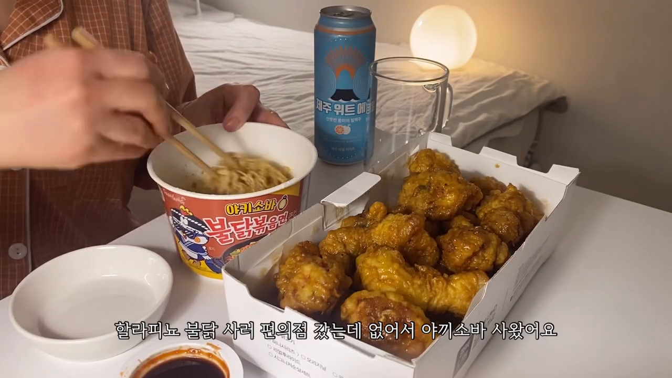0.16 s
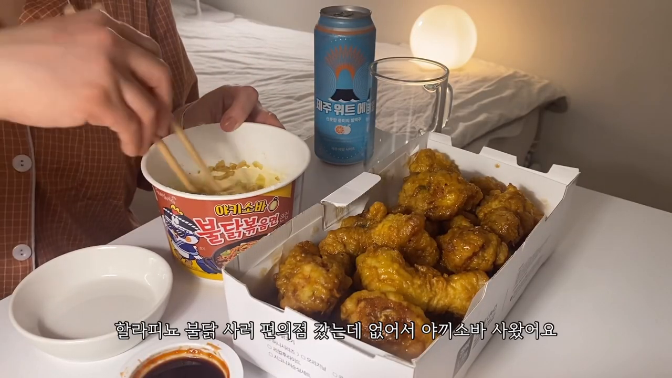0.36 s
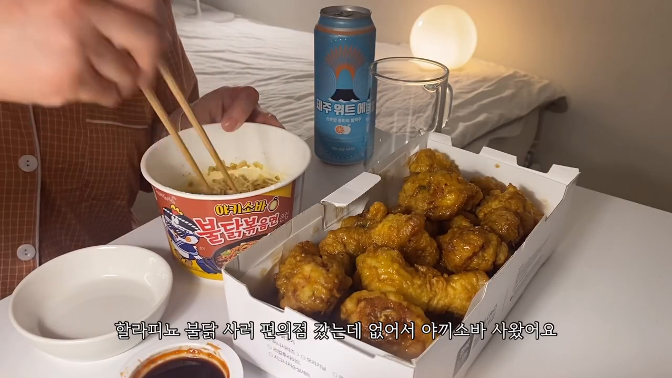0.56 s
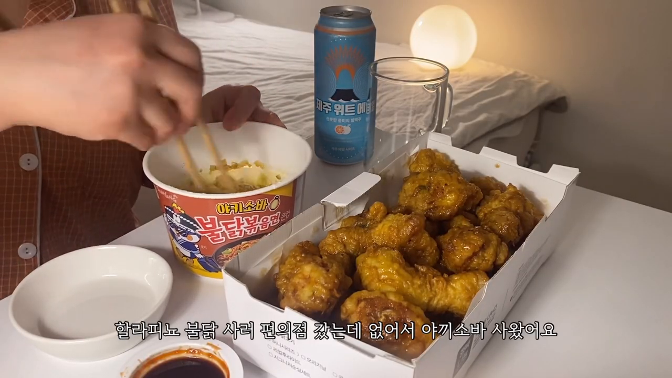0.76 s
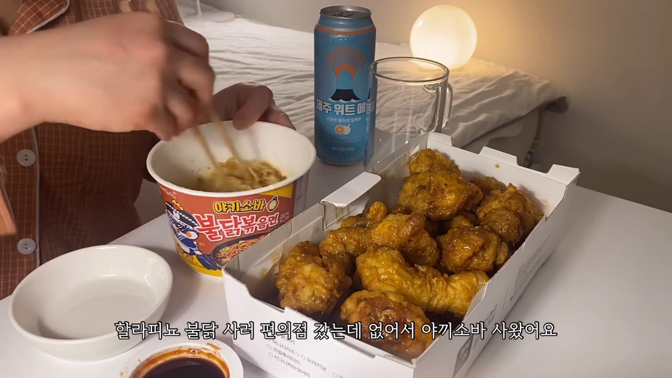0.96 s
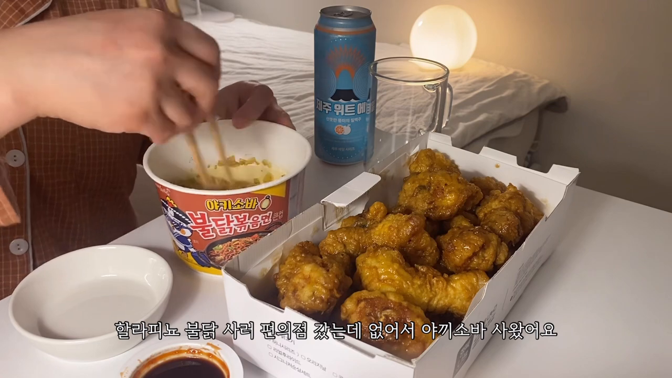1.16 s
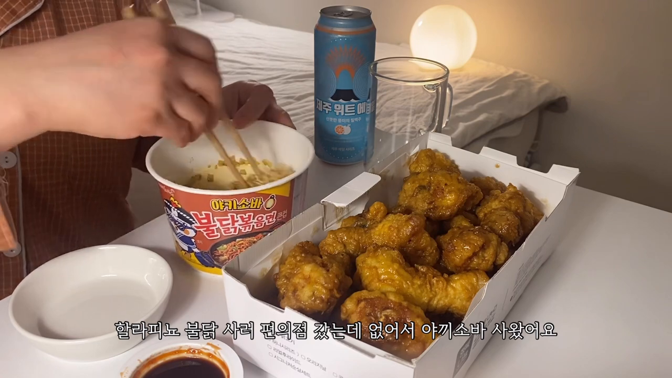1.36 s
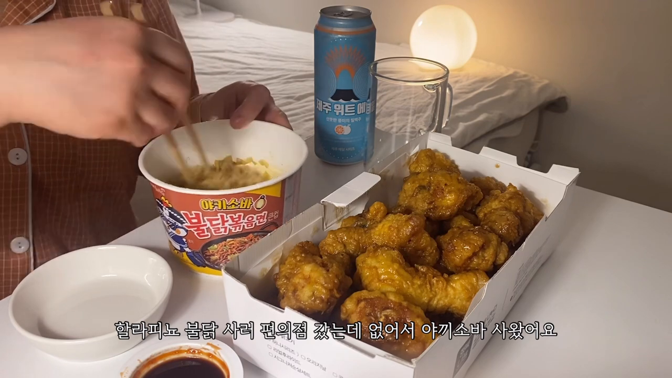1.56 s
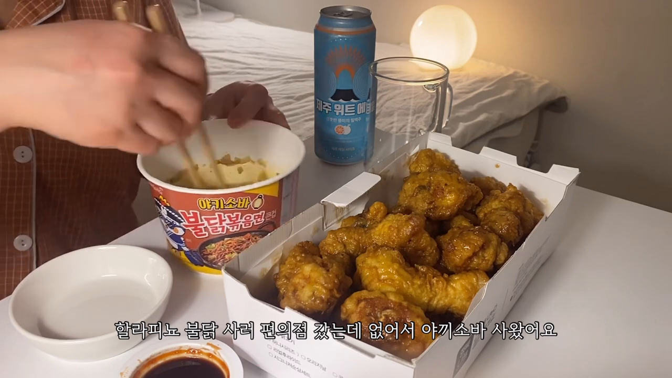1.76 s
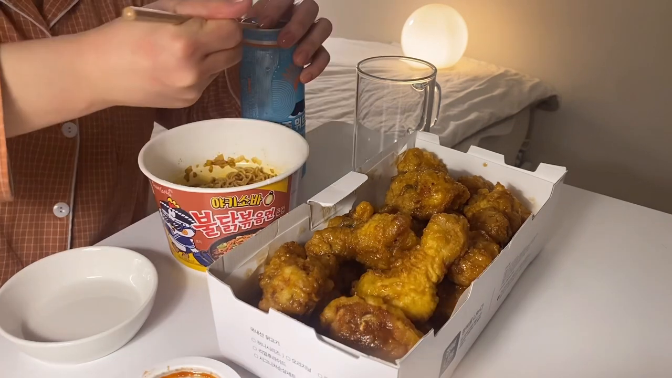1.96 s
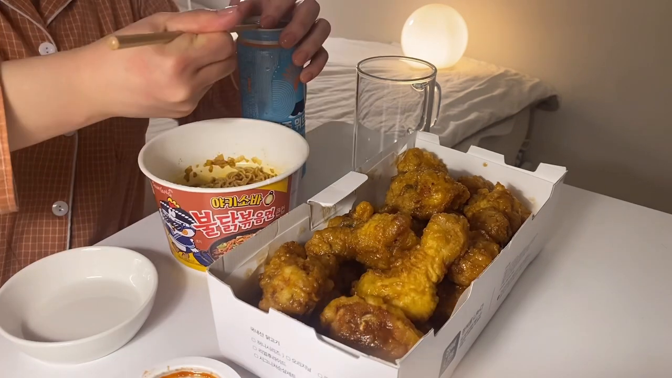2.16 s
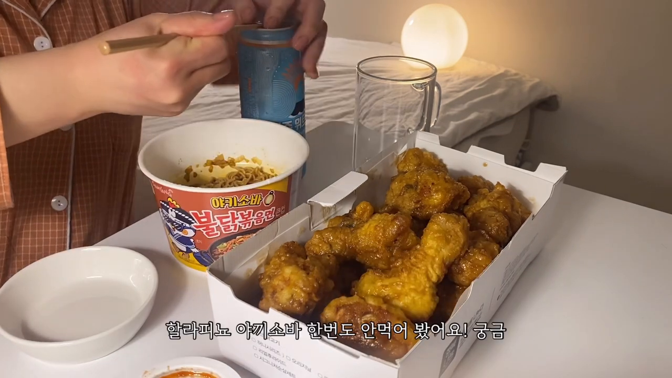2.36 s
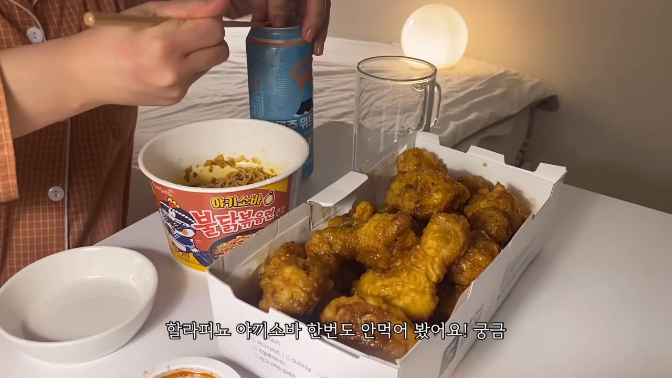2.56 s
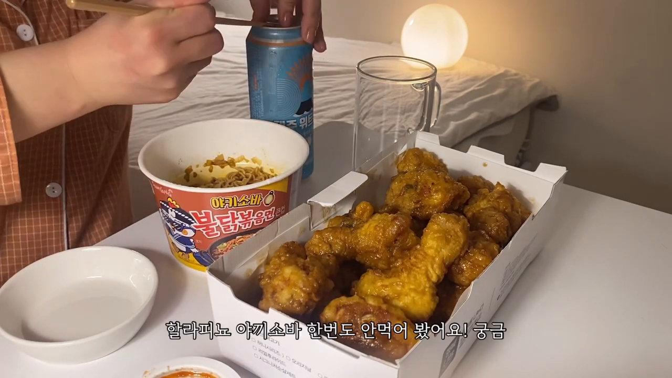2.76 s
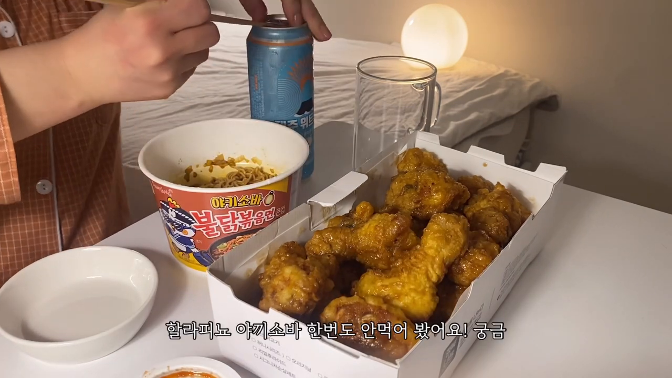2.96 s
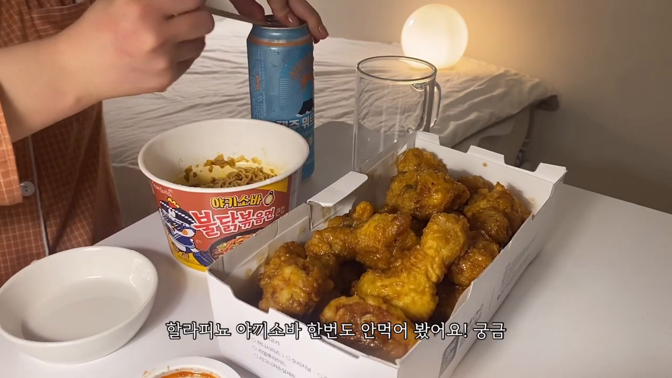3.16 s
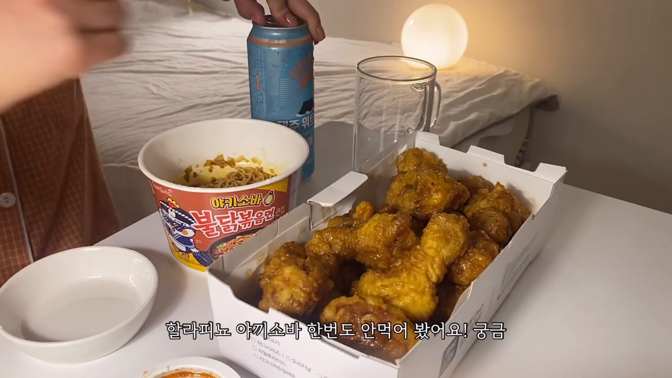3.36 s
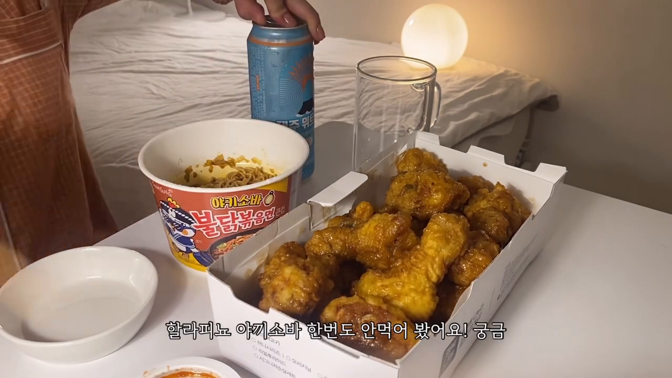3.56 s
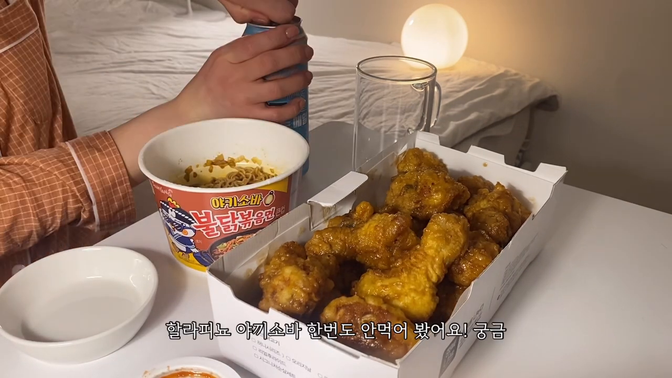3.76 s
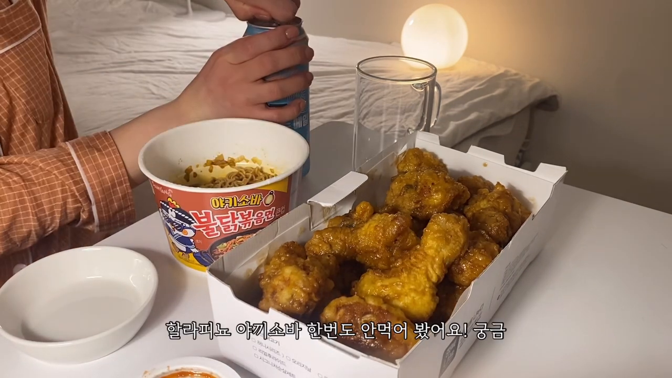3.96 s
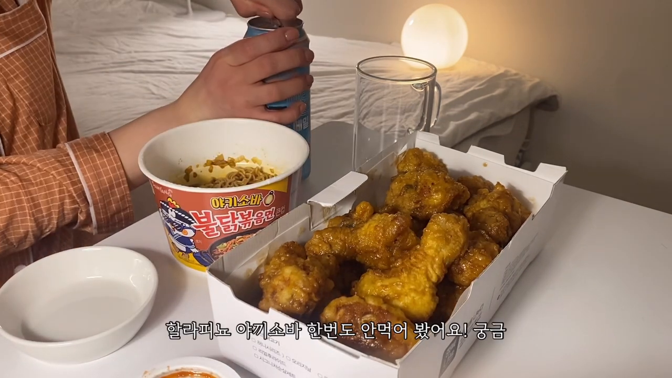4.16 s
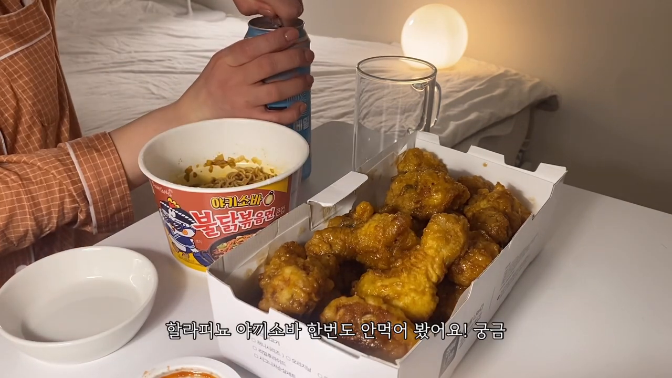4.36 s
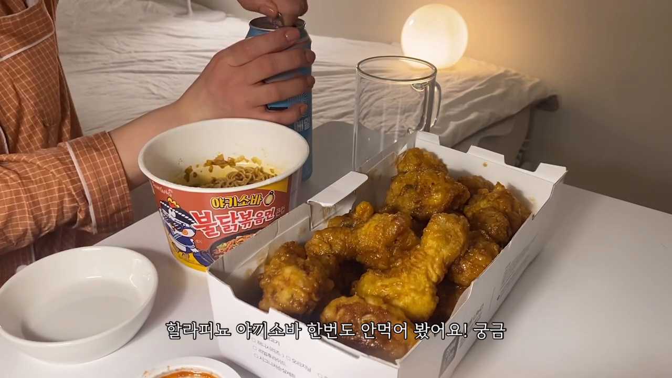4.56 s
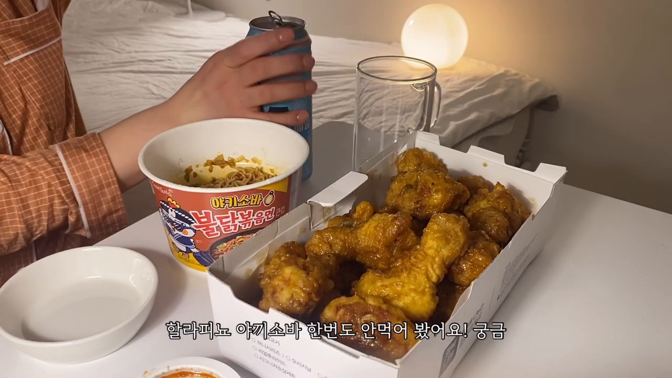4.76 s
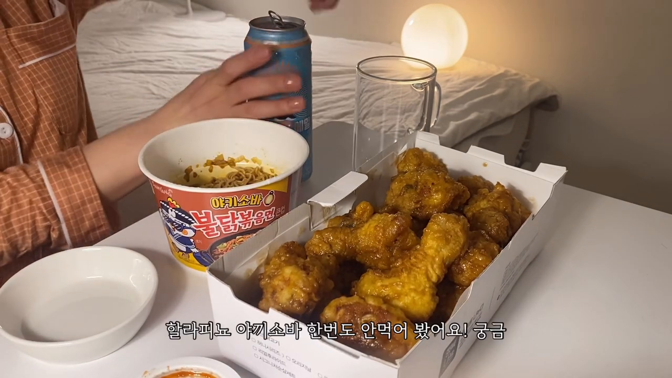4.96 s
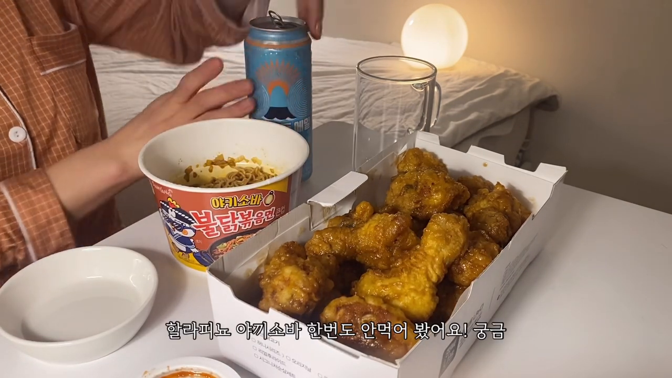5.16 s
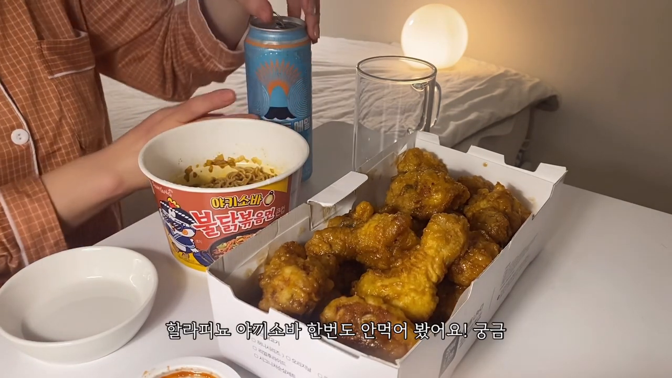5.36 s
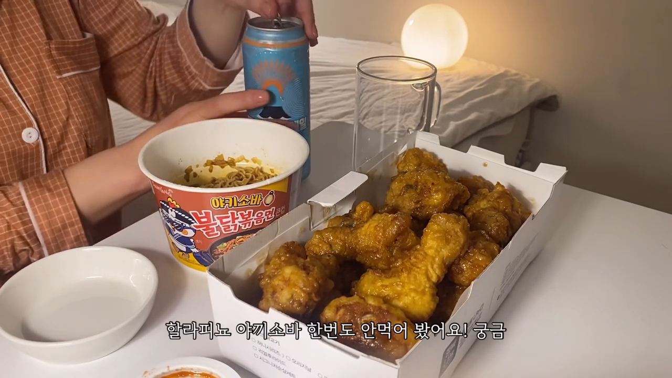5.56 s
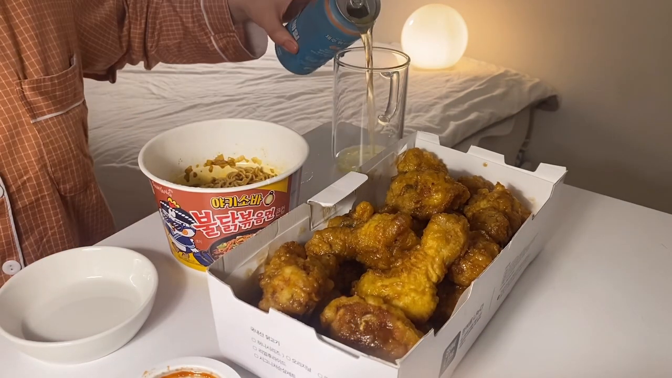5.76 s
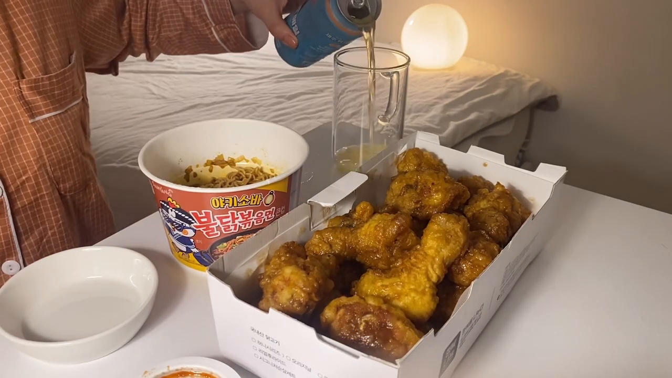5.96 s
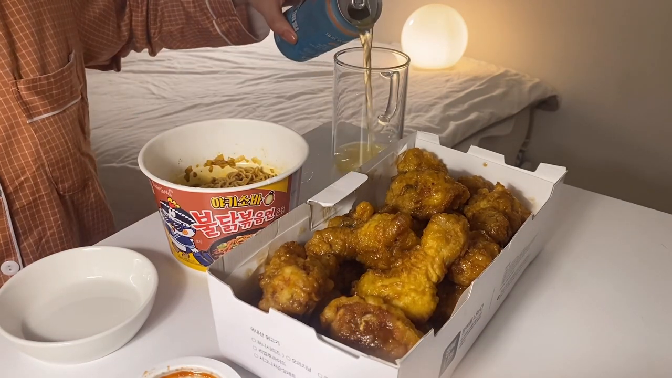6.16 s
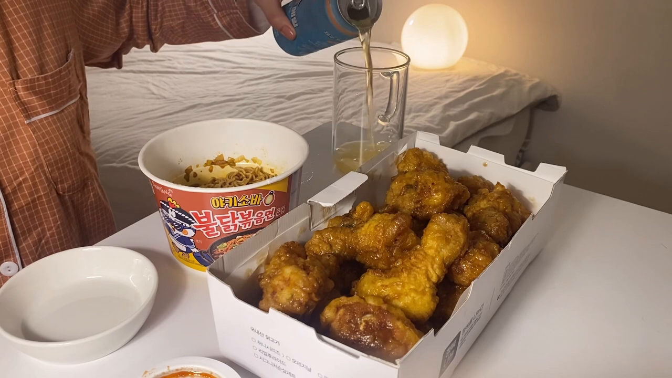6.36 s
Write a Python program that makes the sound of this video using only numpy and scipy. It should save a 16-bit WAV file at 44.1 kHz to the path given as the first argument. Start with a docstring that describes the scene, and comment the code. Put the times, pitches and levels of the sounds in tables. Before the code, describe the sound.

Chopsticks squelch through sticky noodles in a paper cup, then a drink can cracks open with a sharp hiss and splashes into a glass.

```python
"""Noodles in a paper cup, then a drink can opened and poured

Chopsticks stir sticky noodles: shaped noise squelches and crackles, damped rings and noise bursts tap.
After a cut, fingers click on a can on the table amid rustling noise, and the tab tears open in two pulls:
snaps ring the can's modes, coloured noise hisses as gas, and a low sine hums. The drink splashes into a
glass as rings of rising pitch, random bubble pops and fizz. A small, quiet bedroom answers with decaying
echoes over room tone."""
import sys
import numpy as np
from scipy import signal
from scipy.fft import rfft, irfft
from scipy.io import wavfile

SR = 44100
rng = np.random.default_rng(int(sys.argv[2]) if len(sys.argv) > 2 else 0)


def int16_out(signal):
    """Quantize to a 16-bit WAV file."""
    q = np.round(np.clip(np.atleast_2d(signal).T, -1, 1) * 32767)
    wavfile.write(sys.argv[1], SR, q.astype(np.int16))


N = 283122

CUT_S = 1.823   # the stirring and its room tone end here
CUTOFF_HZ = 16000

# tears of the tab's score line: start_s, ring_db, pitch_hz, mid_snap_db, treble_db, body_db, left_minus_right_db
TEARS = [(3.854, -30.5, 3700, -36, -18.5, -50, 9.5), (3.8558, -22.5, 3120, -25, -20.5, -54, 6.5),
         (3.8579, -16, 3860, -25.5, -24, -40.5, 6), (3.996, -37.5, 4800, -37, -32.5, -53, -1),
         (4.0154, -34.5, 3700, -28.5, -42.5, -44, 5.5), (4.3659, -25.5, 3410, -22, -9.5, -39.5, -8.5),
         (4.375, -26, 2200, -24, -20, -34, 2.5), (4.3767, -17, 3240, -9, -13.5, -16, 9.5),
         (4.3831, -18.5, 1840, -8, -12.5, -26.5, 1.5)]
# small bubbles burst: start_s, peak_db, pitch_hz
BURSTS = [(5.6298, -40, 10940), (5.708, -43, 6800), (5.773, -45, 6900), (5.783, -38.5, 5640),
          (5.8901, -38, 6550), (5.968, -45, 5050), (6.002, -39, 6560), (6.0835, -37.5, 10230),
          (6.0952, -38, 6900), (6.1701, -44, 6860), (6.223, -44, 7150), (6.2617, -46, 4700),
          (6.366, -47, 6640), (6.39, -48, 8000)]
# hands and sleeves move, the can slides: full_strength_s, swell_s, hold_s, cloth_db, table_rub_db, skin_db,
# table_boom_db
MOVEMENTS = [(1.88, 0.061, .01, -82, -97, -85, -92), (1.956, 0.0047, 0.0031, -66, -76, -67.5, -99),
             (2.134, 0.036, .01, -89, -83, -72, -97), (2.314, 0.0017, 0.0023, -72, -65.5, -93, -101),
             (2.398, 0.087, 0.077, -78, -70.5, -79, -67), (2.465, 0.0037, 0.069, -57, -48, -62.5, -59),
             (2.556, 0.0018, 0.0028, -58, -51, -51.5, -55), (2.702, 0.012, 0.023, -72, -67.5, -76, -75),
             (2.778, 0.056, 0.0079, -98, -80, -83, -63.5), (2.85, 0.034, 0.069, -79.5, -83, -78.5, -95),
             (3.039, .02, 0.038, -79, -75, -89, -86), (3.201, .015, 0.0068, -71, -69, -65, -102),
             (3.682, 0.0025, 0.032, -81, -76.5, -55.5, -99), (4.766, .04, .04, -88.5, -80, -90, -97),
             (5.025, .08, .01, -65.5, -73, -62, -95), (5.433, 0.0093, .05, -78, -79.5, -70, -85),
             (5.497, 0.0031, 0.07, -93, -66.5, -84, -60.5), (5.58, .003, 0.0068, -73.5, -63.5, -86, -60.5)]
# correlation of left and right: frequency_hz, likeness (1 = identical)
STEREO_LIKENESS = [(30, 0.84), (60, 0.86), (125, 0.94), (300, 0.57), (700, 0.2), (2000, 0.1), (8000, 0.3)]


def amp(db):
    """Level to gain: 20 dB is a factor of ten in amplitude."""
    return 10 ** (np.asarray(db) / 20)


def unit(x):
    """Normalization: scale to rms 1."""
    return x / np.sqrt(np.mean(x ** 2) + 1e-20)


def levels(rows):
    """Envelopes: gains interpolated in dB along a curve table, silent outside it."""
    times_s, *columns = np.transpose(rows)
    t = np.arange(N) / SR
    return [amp(np.interp(t, times_s, column, -200, -200)) for column in columns]


def at_hz(points, hz):
    """Logarithmic frequency scale: read a curve at hz, interpolating along log frequency."""
    points_hz, values = np.transpose(points)
    return np.interp(np.log(hz), np.log(points_hz), values)


def colour(x, spectrum):
    """Spectral shaping: weight each frequency of a noise by a curve in dB; rms 1."""
    hz = np.maximum(np.fft.rfftfreq(x.shape[-1], 1 / SR), 1)
    return unit(irfft(rfft(x) * amp(at_hz(spectrum, hz)), x.shape[-1]))


def wide_noise(spectrum):
    """Interaural correlation: mid and side noise set how alike the two sides are at each frequency."""
    hz = np.maximum(np.fft.rfftfreq(N, 1 / SR), 1)
    alike = np.clip(at_hz(STEREO_LIKENESS, hz), -1, 1)
    mid, side = rfft(rng.standard_normal((2, N)))
    stereo = np.sqrt(1 + alike) * mid + np.sqrt(1 - alike) * side * [[1], [-1]]
    return colour(irfft(stereo, N), spectrum)


def grains(per_s, spread_db, smooth):
    """Shot noise: random clicks of uneven size over a share of smooth noise."""
    sizes = amp(spread_db * np.minimum(rng.exponential(1, N), 4)) * rng.standard_normal(N)
    clicks = sizes * (rng.random(N) < per_s / SR)
    return unit(clicks) + smooth * rng.standard_normal(N)


def ring(x, hz, t60):
    """Modal resonance: a unit click sets a sine of height 1 ringing, falling 60 dB in t60 seconds."""
    radius, angle = amp(-60 / (t60 * SR)), 2 * np.pi * hz / SR
    return signal.lfilter([0, np.sin(angle)], [1, -2 * radius * np.cos(angle), radius ** 2], x + 1e-18)


def bubbles(per_s, low_hz, high_hz, cycles, spread_db):
    """Bubble resonance: random pops, each dealt one of 24 pitches and damped over some cycles; rms 1."""
    pops, dealt = grains(per_s, spread_db=spread_db, smooth=0), rng.integers(0, 24, N)
    pitches_hz = np.geomspace(low_hz, high_hz, 24)
    return unit(sum(ring(pops * (dealt == k), hz, cycles / hz) for k, hz in enumerate(pitches_hz)))


def place(out, start_s, db, wave):
    """Superposition: add a short wave at start_s with its peak at db."""
    i = round(start_s * SR)
    out[..., i:i + len(wave)] += (amp(db)[..., None] * wave / np.abs(wave).max())[..., :N - i]


def add(out, start_s, db, hz, cycles, rough, rise=0.):
    """Damped oscillation: a noise-roughened ring falls 60 dB in some cycles; rise lifts its pitch."""
    t = np.arange(2048) / SR
    wave = np.sin(2 * np.pi * hz * t * (1 + rise * hz * t)) + rough * rng.standard_normal(len(t))
    wave *= np.exp(-np.log(1000) * t * hz / cycles)
    place(out, start_s, db, wave)


def snap(out, start_s, db, low_hz, high_hz, ms):
    """Impact noise: a band-limited burst whose source decays 60 dB in ms milliseconds."""
    t = np.arange(1024) / SR
    burst = rng.standard_normal(len(t)) * amp(-60000 * t / ms)
    burst[0] = 3   # the first contact is a clean click
    band = signal.butter(2, [low_hz, high_hz], "band", fs=SR, output="sos")
    place(out, start_s, db, signal.sosfilt(band, burst))


def strokes(full_s, swell_s, hold_s, db, fall_db_s):
    """Energy addition: gains that swell, hold and fall at a steady dB rate sum in power."""
    swell_db = 25   # rise over one swell time
    power = np.zeros(N)
    for full, swell, hold, level, fall in np.broadcast(full_s, swell_s, np.maximum(hold_s, 0), db, fall_db_s):
        first = max(int((full - 2 * swell) * SR), 0)
        i = np.arange(first, min(int((full + hold + .5) * SR), N))
        t = i / SR - full
        rising_db = swell_db * np.minimum(t, 0) / swell
        falling_db = fall * np.maximum(t - hold, 0)
        power[i] += amp(level + rising_db - falling_db) ** 2
    return np.sqrt(power)


def stirring():
    """Stick-slip and impact: noodles squelch on paper and part with wet crackle; the sticks tap."""
    # strokes through the noodles: full_strength_s, swell_s, hold_s, squelch_db, crackle_db
    stir_strokes = [(0.002, 0.0035, 0.01, -59.5, -63), (0.031, 0.0011, 0.0036, -51, -88),
                    (0.107, .01, 0.0089, -80, -82), (0.193, 0.022, 0.11, -81, -78),
                    (0.313, 0.026, 0.014, -66.5, -66), (0.365, 0.011, 0.01, -59.5, -63),
                    (0.436, 0.0073, 0.013, -64, -69.5), (0.542, 0.0083, 0.0072, -72, -83),
                    (0.697, 0.042, 0.018, -67, -66.5), (0.794, .02, .01, -66, -69),
                    (0.845, .002, 0.0091, -59.5, -64), (0.867, .04, 0.0047, -59.5, -60.5),
                    (0.989, 0.057, 0.013, -58.5, -62), (1.127, 0.034, 0.029, -65, -65.5),
                    (1.2, 0.015, 0.022, -65, -65), (1.262, .02, 0.076, -63.5, -63.5),
                    (1.405, 0.013, .05, -67, -67.5), (1.494, 0.0049, 0.013, -62, -58),
                    (1.56, 0.011, 0.011, -55, -58.5), (1.647, 0.013, 0.013, -64, -59),
                    (1.707, 0.061, .02, -59, -60), (1.803, 0.017, 0.026, -60.5, -57.5)]
    # squelch along the cup wall: frequency_hz, relative_level_db
    cup_spectrum = [(290, -16), (500, 17), (927, 5), (1410, 8), (2060, 9.5), (3080, 3), (4000, 3.5),
                    (5200, -61), (8800, -120)]
    # crackle of sticky strands: frequency_hz, relative_level_db
    sticky_spectrum = [(1470, -67), (2500, -47), (3070, -14), (3480, -3.5), (5130, -10.5), (7610, 1.5),
                       (9880, -7), (14000, 2), (16000, -3), (16500, -43)]
    # sticks tap the cup wall: start_s, peak_db, pitch_hz, treble_relative_to_peak_db
    wall_taps = [(0.035, -29.5, 1680, -34), (0.108, -48, 830, -21), (0.205, -53, 860, -9),
                 (0.303, -61, 724, -8), (0.377, -45, 1310, -2), (0.437, -50, 1110, -18),
                 (0.793, -57, 885, -4), (0.848, -42, 1480, -14), (0.85, -45, 670, -30),
                 (0.967, -45.5, 1460, 1), (0.992, -49, 1290, -4), (1.13, -47, 1240, 5),
                 (1.157, -44.5, 1400, -20), (1.271, -43, 1320, -26), (1.421, -48.5, 1270, -12),
                 (1.439, -46.5, 1250, -5), (1.495, -45, 2070, 1.5), (1.567, -48, 1330, -17),
                 (1.711, -41.5, 1420, -24), (1.798, -45, 1190, 2)]
    # single strands let go: start_s, peak_db, pitch_hz
    strand_ticks = [(0.109, -67, 7550), (0.1421, -59, 6380), (0.17, -51.5, 7100), (0.209, -59, 6400),
                    (0.276, -56.5, 7100), (0.3132, -51, 7630), (0.3716, -57, 8110), (0.3773, -44, 7700),
                    (0.5412, -56, 6100), (0.639, -54, 12700), (0.666, -52, 9050), (0.801, -48, 6600),
                    (0.84, -42, 7700), (0.863, -45, 7820), (0.88, -36.5, 7200), (0.9867, -56, 8070),
                    (1.0136, -46, 7580), (1.1279, -58, 6450), (1.1275, -50, 7080), (1.2062, -60, 12800),
                    (1.208, -47, 7400), (1.4052, -42, 8000), (1.4975, -45, 12700), (1.6497, -57, 7980),
                    (1.805, -38, 8360)]
    squelch_fall_db_s, crackle_fall_db_s = 317, 225

    full_s, swell_s, hold_s, squelch_db, crackle_db = np.transpose(stir_strokes)
    squelch = bubbles(4000., 800, 3500, cycles=14.0, spread_db=3.0) + rng.standard_normal(N)
    out = strokes(full_s, swell_s, hold_s, squelch_db, squelch_fall_db_s) * colour(squelch, cup_spectrum)
    crackle = colour(grains(6000., spread_db=2.5, smooth=1.2), sticky_spectrum)
    out += strokes(full_s, swell_s, hold_s, crackle_db, crackle_fall_db_s) * crackle
    for start_s, db, hz, treble_db in wall_taps:
        add(out, start_s, db, hz, cycles=18.0, rough=0.22)
        snap(out, start_s, db - 15.0, 2340, 3750, ms=8.7)
        snap(out, start_s, db + treble_db, 7600, 10700, ms=9.8)
    for start_s, db, hz in strand_ticks:
        snap(out, start_s, db, 0.62 * hz, min(1.6 * hz, CUTOFF_HZ), ms=12.0)
    return out * (np.arange(N) < CUT_S * SR)


def opening():
    """Modal excitation: each tear is a sharp broad snap that also rings the can; stereo."""
    # modes of the can, damped by the hand: frequency_hz, relative_level_db, t60_s
    can_modes = [(1820, -25, .03), (2470, -22.5, .03), (3490, -5, 0.11), (5230, -13, .03), (5910, 9, 0.017),
                 (7190, 12, 0.033), (10480, -4, .02)]
    can_db = -36   # added to the level of every mode

    out, sides = np.zeros((2, N)), np.array([.5, -.5])
    for start_s, db, hz, mid_db, treble_db, body_db, pan_db in TEARS:
        add(out, start_s, db + pan_db * sides, hz, cycles=51.0, rough=0.017)
        snap(out, start_s, mid_db + pan_db * sides, 1900, 9900, ms=5.3)
        snap(out, start_s, treble_db + pan_db * sides, 6400, 11000, ms=9.1)
        snap(out, start_s, body_db, 160, 1200, ms=16.0)
    snaps = out.mean(axis=0)
    return out + sum(amp(can_db + db) * ring(snaps, hz, t60) for hz, db, t60 in can_modes)


def hissing():
    """Turbulent jet noise: a wide quick puff over a slower trail; droplets in the slit make it sputter."""
    # gas rushes out after a tear: start_s, hold_s, puff_db, trail_db, trail_fall_db_per_s
    gas_rushes = [(3.864, 0.011, -27, -30, 199), (3.997, .02, -43, -47, 234.5),
                  (4.38, .002, -20.5, -28, 139.5)]
    # one spectrum for each rush: frequency_hz, relative_level_db
    gas_spectra = [
        [(180, -40.5), (300, -13.5), (457, -19), (494, 1.5), (718, -43.5), (776, -19), (879, -25.5),
         (1450, -14.5), (2130, -16), (2240, -6), (2910, -4.5), (4100, -3), (4580, -4.5), (5780, -0.5),
         (12400, -12), (16100, -43), (22000, -120)],
        [(180, -17), (300, -2.5), (416, 2.5), (457, -11), (509, 5.5), (980, -40), (1300, -6), (1690, -33),
         (3740, 3.5), (4440, -4), (7420, -9.5), (11300, -18), (12400, -43), (16100, -77), (22000, -120)],
        [(120, -33), (200, 1), (234, -18.5), (324, -8.5), (379, -16.5), (554, -7), (705, -19), (824, -11.5),
         (1590, -10), (2400, 0), (3280, -2.5), (3970, -8), (7010, -1), (8480, -11), (12000, -20.5),
         (13200, -44.5), (16100, -55), (22000, -120)],
    ]
    swell_s, puff_fall_db_s = .003, 402.5
    sputter_db = 1.8   # rms swing of the level

    lowpass = signal.butter(2, 300., fs=SR, output="sos")
    slow = signal.sosfilt(lowpass, rng.standard_normal(N))
    gas = np.zeros((2, N))
    for (start_s, hold_s, puff_db, trail_db, trail_fall), spectrum in zip(gas_rushes, gas_spectra):
        gain = strokes(start_s, swell_s, hold_s, [puff_db, trail_db], [puff_fall_db_s, trail_fall])
        gas += gain * wide_noise(spectrum)
    return amp(sputter_db * unit(slow)) * gas


def humming():
    """Low resonance: the full can's tone swells in after the last tear and dies slowly."""
    # hum of the full can: frequency_hz, level_db, t60_s
    can_hum = (138, -46, 2.1)
    hz, db, t60 = can_hum
    t = np.maximum(np.arange(N) / SR - TEARS[-1][0], 0)
    return amp(db - 60 * t / t60) * np.sin(2 * np.pi * hz * t) * (1 - np.exp(-t / .02))


def drops():
    """Bubble resonance: each drop lands with a tick and its trapped air rings with rising pitch."""
    # drops in the glass: start_s, peak_db, pitch_hz
    gulps = [(5.7091, -46.5, 3750), (5.739, -58.5, 1860), (5.7703, -57.5, 3270), (5.78, -71, 1720),
             (5.83, -53.5, 1900), (5.8885, -50.5, 3480), (5.9537, -52, 2090), (5.9774, -47.5, 1900),
             (6.051, -40.5, 3260), (6.02, -46, 2660), (6.093, -48, 1710), (6.1092, -49.5, 1510),
             (6.1459, -42.5, 1970), (6.2235, -40, 1870), (6.265, -38.5, 3300), (6.27, -44, 1630),
             (6.305, -48.5, 2000), (6.3469, -48.5, 1730), (6.3861, -41.5, 1870)]
    out = np.zeros(N)
    for start_s, db, hz in gulps:
        add(out, start_s, db, hz, cycles=45.0, rough=0.1, rise=0.001)
        snap(out, start_s, db - 17, 470, 6500, ms=6.0)
    for start_s, db, hz in BURSTS:
        add(out, start_s, db, hz, cycles=30.0, rough=.12, rise=0.002)
        snap(out, start_s, db - 8.5, 3800, 11000, ms=6.1)
    return out


def pouring():
    """Bubble entrainment: the stream traps bubbles of many sizes in the glass; foam fizzes in patches."""
    # flow of the stream: time_s, splash_db, fizz_db
    stream = [(5.62, -106, -98), (5.7, -106, -95), (5.84, -81, -79), (6.02, -61, -68), (6.07, -70, -83),
              (6.1, -59, -78), (6.18, -75.5, -83), (6.23, -63, -75.5), (6.42, -64, -84)]
    # splash noise: frequency_hz, relative_level_db
    splash_spectrum = [(290, -52), (500, 8), (641, 10.5), (960, -30), (1840, 15), (2390, -13), (3380, 11.5),
                       (3740, -7), (4500, -7), (5850, -19), (9900, -120)]
    # fizz noise: frequency_hz, relative_level_db
    fizz_spectrum = [(2470, -29.5), (4200, -24), (6600, -17), (8620, -6), (10300, 4), (12300, -15),
                     (13700, -28), (15000, -35)]
    foam_under_db, foam_fall_db_s = 30.5, 304   # each burst leaves a patch of fizz this far under its peak

    splash_gain, fizz_gain = levels(stream)
    trapped = bubbles(1200., 1250, 3900, cycles=40.0, spread_db=4.5)
    water = colour(rng.standard_normal(N), splash_spectrum)
    splash = splash_gain * unit(trapped + 1.2 * water)

    burst_s, burst_db, _ = np.transpose(BURSTS)
    fizz_gain = fizz_gain + strokes(burst_s, .002, 0, burst_db - foam_under_db, foam_fall_db_s)
    pops = bubbles(2300.0, 3560, 11900, cycles=53.0, spread_db=13.0)
    foam = colour(grains(5000., spread_db=0.0, smooth=0.43), fizz_spectrum)
    return splash + fizz_gain * unit(pops + 0.64 * foam)


def handling():
    """Impact: fingers tick on the can as a short ring in a broad click, with a knock through the table."""
    # nails and fingers touch can and table: start_s, ring_db, pitch_hz, click_db, treble_db, table_knock_db
    touches = [(1.901, -58.5, 3140, -79, -81, -83), (1.9638, -49.5, 3070, -63, -82, -77),
               (2.137, -56, 3200, -61, -66, -77), (2.3166, -42.5, 3120, -67, -83, -52),
               (2.4711, -48.5, 3040, -57, -74, -39.5), (2.5599, -40.5, 1200, -35, -36, -38),
               (2.7069, -60.5, 1880, -56, -51.5, -71), (2.8674, -67.5, 3160, -70, -60, -67),
               (3.0385, -70, 1280, -65, -88, -80), (3.1592, -54, 6400, -54, -51, -59.5),
               (3.1882, -47, 6040, -52, -47, -86), (3.2098, -45, 3300, -62, -67, -67),
               (3.682, -44.5, 3470, -49.5, -40, -58.5), (4.348, -45, 3170, -50, -51, -69),
               (4.5137, -53.5, 2630, -50, -52, -38.5), (4.664, -55, 2260, -53, -73, -46),
               (4.7031, -52.5, 3980, -58, -67.5, -53.5), (5.4303, -65, 4680, -65, -51, -55.5),
               (5.4988, -62, 1506, -60, -74, -49), (5.5832, -61, 1300, -57, -61.5, -60)]
    out = np.zeros(N)
    for start_s, ring_db, hz, click_db, treble_db, knock_db in touches:
        add(out, start_s, ring_db, hz, cycles=30.0, rough=.08)
        snap(out, start_s, click_db, 2000, 5000, ms=7.)
        snap(out, start_s, treble_db, 5000, 11000, ms=3.4)
        snap(out, start_s, knock_db, 210, 1500, ms=12.0)
    return out


def rustling():
    """Friction noise: cloth and skin rustle and the can drags on the table, as uneven coloured grains."""
    # rustle of cloth: frequency_hz, relative_level_db
    cloth_spectrum = [(880, -56), (1500, -16), (1740, -13), (1910, -12.5), (2260, -8), (2560, -10.5),
                      (3090, 0.5), (3410, -1), (3990, -5.5), (4660, -42.5), (5200, -12.5), (6760, -52.5),
                      (11400, -120)]
    # can rubbing on the table: frequency_hz, relative_level_db
    table_spectrum = [(88, -44), (150, 0.5), (211, 12), (270, -8), (535, 1), (735, -16), (1000, -18),
                      (1230, 2.5), (1470, -23), (1930, -19.5), (2500, -51), (3250, -49.5), (5500, -120)]
    # rustle of skin: frequency_hz, relative_level_db
    skin_spectrum = [(2820, -24), (4800, -2.5), (10300, -8.5), (12400, -18.5), (12800, -17), (13100, -31),
                     (14000, -21)]
    cloth_fall_db_s, rub_fall_db_s, skin_fall_db_s = 445, 345, 348.5

    full_s, swell_s, hold_s, cloth_db, rub_db, skin_db, _ = np.transpose(MOVEMENTS)
    cloth = colour(grains(3500.0, spread_db=11.0, smooth=4.5), cloth_spectrum)
    table = colour(grains(900.0, spread_db=4.0, smooth=0.25), table_spectrum)
    skin = colour(grains(4000., spread_db=6, smooth=0.8), skin_spectrum)
    out = cloth * strokes(full_s, swell_s, hold_s, cloth_db, cloth_fall_db_s)
    out += table * strokes(full_s, swell_s, hold_s, rub_db, rub_fall_db_s)
    return out + skin * strokes(full_s, swell_s, hold_s, skin_db, skin_fall_db_s)


def booming():
    """Structure-borne sound: low band noise in the table top follows the movements."""
    boom_fall_db_s = 300
    full_s, swell_s, hold_s, *_, boom_db = np.transpose(MOVEMENTS)
    band = signal.butter(2, [130, 330], "band", fs=SR, output="sos")
    boom = unit(signal.sosfilt(band, rng.standard_normal(N)))
    return boom * strokes(full_s, swell_s, hold_s, boom_db, boom_fall_db_s)


def brushing():
    """Friction noise: a sleeve brushes as smooth noise in two soft bands once the arm starts to move."""
    # one long brush: full_strength_s, swell_s, hold_s, level_db, fall_db_per_s
    sleeve = (3.52, .7, .13, -77, 300)
    # brush of the sleeve: frequency_hz, relative_level_db
    sleeve_spectrum = [(1500, -43), (2200, -13), (2600, -3), (3200, -13), (4100, -2), (4700, -17),
                       (8000, -30)]
    start_s = 3.22
    brush = strokes(*sleeve) * colour(rng.standard_normal(N), sleeve_spectrum)
    return brush * (np.arange(N) > start_s * SR)


def room(x):
    """Reverberation: dense echoes, partly different at each side, decay exponentially band by band."""
    # decay: frequency_hz, t60_s
    decay_times = [(200, 0.12), (700, 0.24), (2000, 0.26), (5000, 0.29), (10000, 0.22), (15000, 0.6)]
    # initial strength of the echoes: frequency_hz, relative_level_db
    echo_colour = [(200, 12), (500, 3), (1000, 0.5), (2000, 1.5), (4000, -1), (7000, 8), (11000, 4),
                   (13500, -3.5), (16000, -15)]
    room_db, first_echo_s = 4, 0.002

    t = np.arange(SR // 2) / SR
    edges_hz = 80 * 2 ** np.arange(0, 8, .5)   # half-octave bands
    tail, white = 0, rng.standard_normal((2, 2, len(t)))   # two pairs of mid and side
    for k, (low, high) in enumerate(zip(edges_hz, edges_hz[1:])):
        hz = np.sqrt(low * high)
        bandpass = signal.butter(2, [low, high], "band", fs=SR, output="sos")
        mid, side = signal.sosfilt(bandpass, white[k % 2])
        alike = np.clip(at_hz(STEREO_LIKENESS, hz), -1, 1)
        band = np.sqrt(1 + alike) * mid + np.sqrt(1 - alike) * side * [[1], [-1]]
        tail = tail + band * amp(at_hz(echo_colour, hz) - 60 * t / at_hz(decay_times, hz))
    tail = tail * np.clip(t / first_echo_s, 0, 1) ** 27.0   # nearly silent until the first wall answers
    tail = tail / np.sqrt(np.sum(tail ** 2) / 2)
    return amp(room_db) * signal.fftconvolve(x, tail[None], axes=2)[..., :N]


def room_tone():
    """Stationary background noise: rumble and hiss with a faint tone, different on each side of the cut."""
    # tone before the cut: frequency_hz, relative_level_db
    tone_before = [(12, -70), (42, -55), (64, -9.5), (124, 4.5), (188, -6.5), (347, -1.5), (464, -15),
                   (702, -13.5), (938, -22.5), (1400, -30), (1950, -50), (3300, -120)]
    # tone after the cut: frequency_hz, relative_level_db
    tone_after = [(12, -38.5), (20, -18.5), (58, 4.5), (106, -8.5), (152, -3), (294, -16.5), (365, -15),
                  (582, -27.5), (928, -37), (2110, -45.5), (3270, -39), (4810, -46), (8320, -48),
                  (11600, -55.5), (14000, -66.5)]
    # steady whines before and after the cut: frequency_hz, level_db
    whines = [(6400, -115), (3250, -92)]
    before_db, after_db = -59.5, -58.5

    t = np.arange(N) / SR
    fade = np.clip((t - CUT_S) / 0.0026, 0, 1)
    whine_before, whine_after = [amp(db) * np.sin(2 * np.pi * hz * t) for hz, db in whines]
    before = amp(before_db) * wide_noise(tone_before) + whine_before
    after = amp(after_db) * wide_noise(tone_after) + whine_after
    return before * (1 - fade) + after * fade


def scene():
    """Propagation delay: near sources stand closer to the left, so the right side hears them later."""
    right_lag_s = .00005
    # share of each sound that the room returns
    cup_send_db, tab_send_db, finger_send_db, liquid_send_db, rustle_send_db = -10, -9.5, -2.5, -6, -16.5

    cup = np.tile(stirring(), (2, 1))
    tab, fingers = opening(), handling()
    liquid = drops() + pouring()
    rustle = rustling() + booming() + brushing()
    near = humming() + cup + tab + fingers + liquid + rustle
    near[1] = np.interp(np.arange(N) - right_lag_s * SR, np.arange(N), near[1])

    far = amp(tab_send_db) * tab + amp(finger_send_db) * fingers
    far += amp(liquid_send_db) * liquid + amp(rustle_send_db) * rustle
    cup_echoes, far_echoes = room(np.stack([amp(cup_send_db) * cup, far]))
    cup_echoes = cup_echoes * (np.arange(N) < CUT_S * SR)   # the cut ends these echoes
    return near + hissing() + cup_echoes + far_echoes + room_tone()


def record(dry):
    """Saturation and band limiting: the loudest peaks are rounded, then the top is cut."""
    rounded = .95 * np.tanh(dry / .95)
    lowpass = signal.cheby2(12, 70, CUTOFF_HZ + 700, fs=SR, output="sos")
    return signal.sosfilt(lowpass, rounded)


dry = scene()
out = record(dry)
int16_out(out)
```